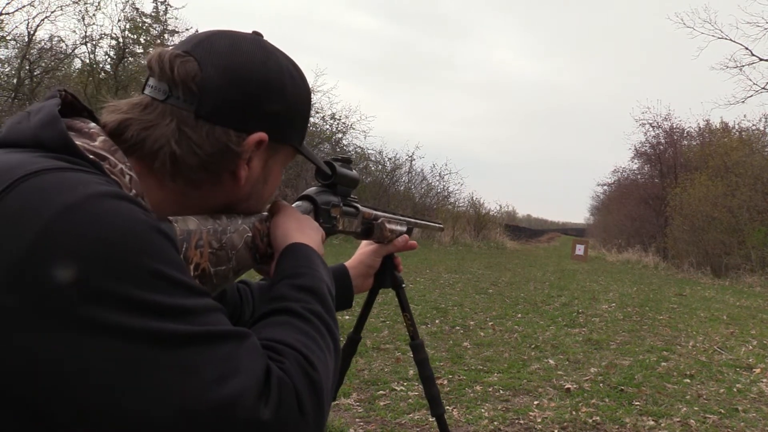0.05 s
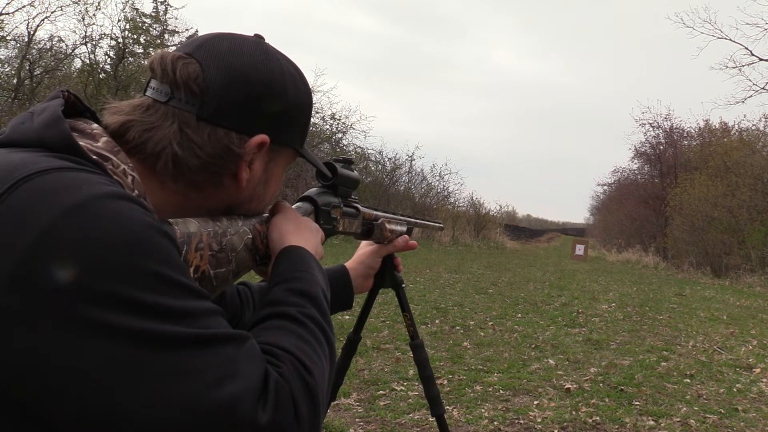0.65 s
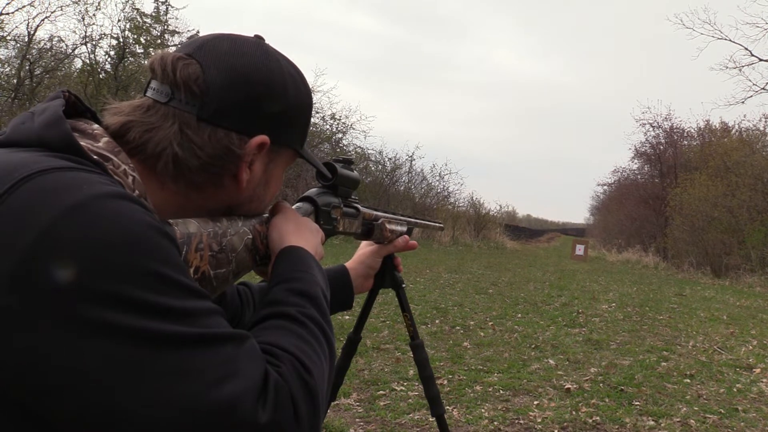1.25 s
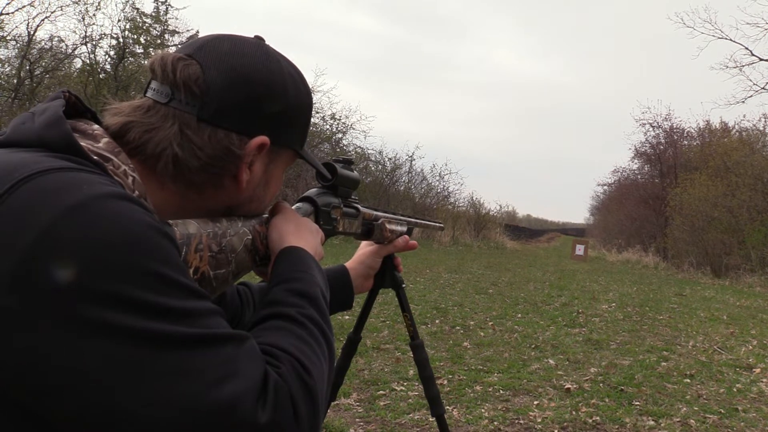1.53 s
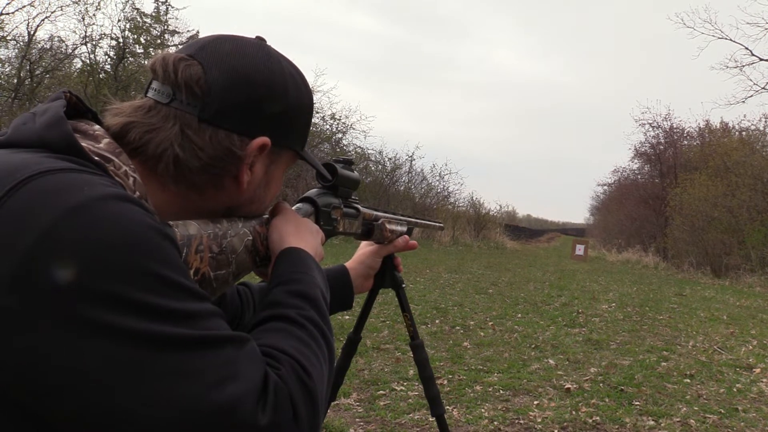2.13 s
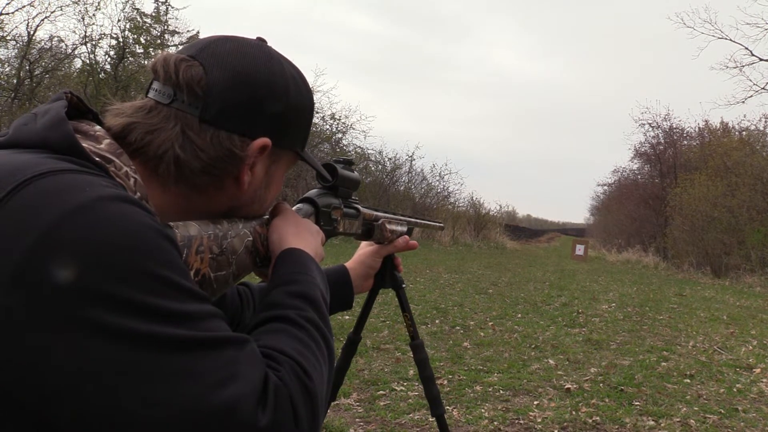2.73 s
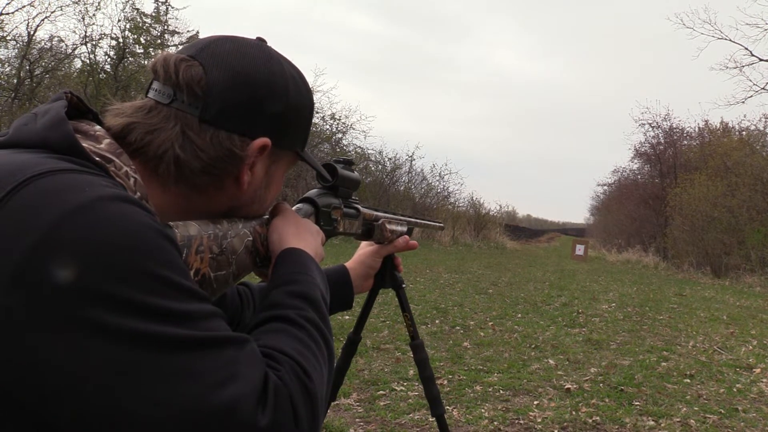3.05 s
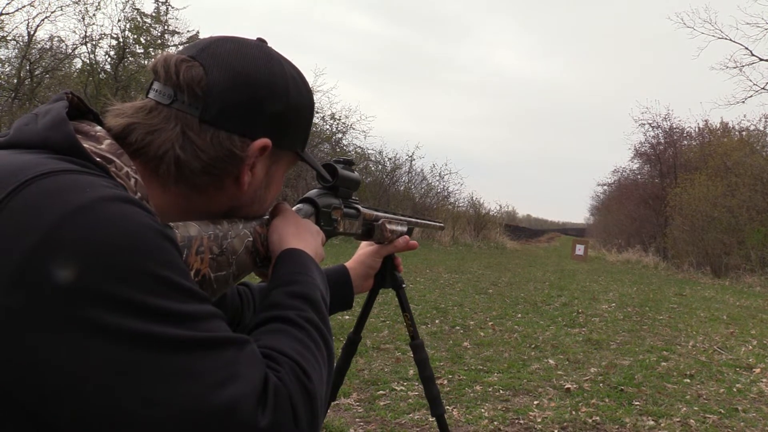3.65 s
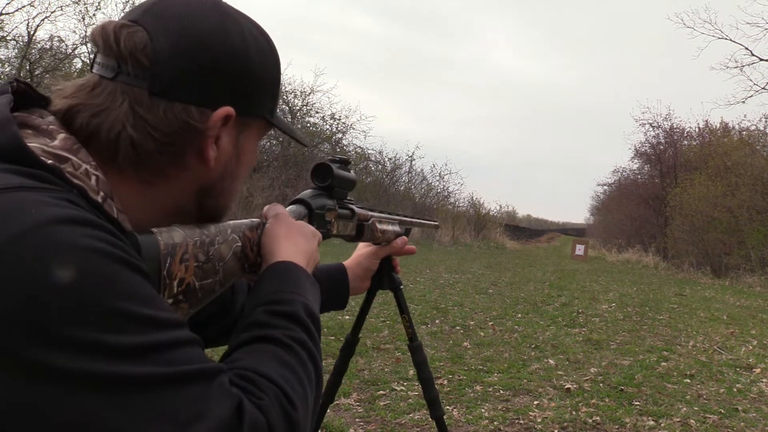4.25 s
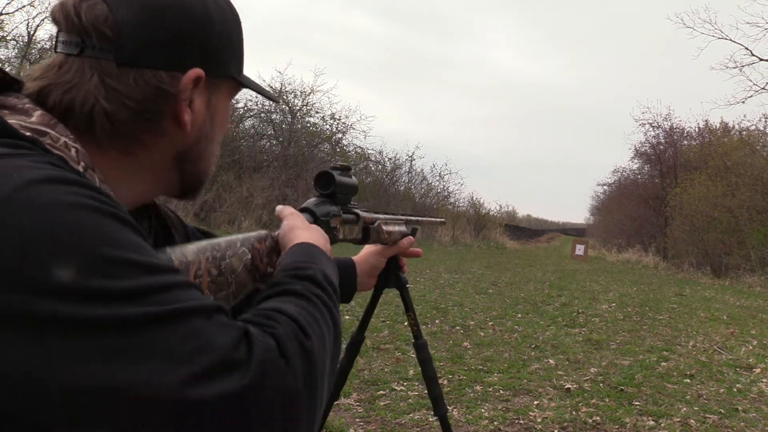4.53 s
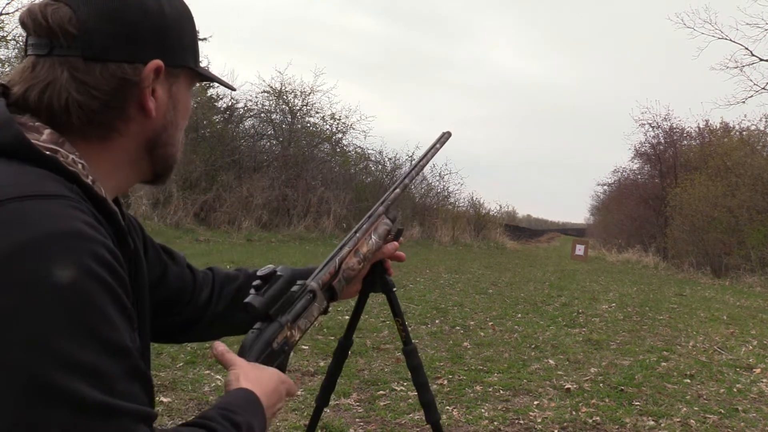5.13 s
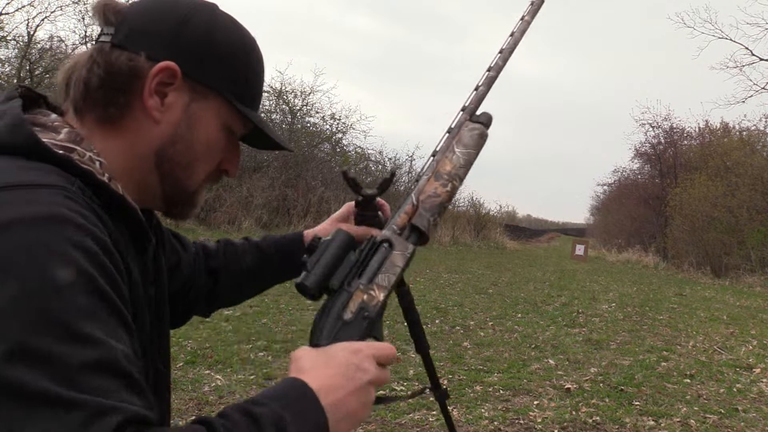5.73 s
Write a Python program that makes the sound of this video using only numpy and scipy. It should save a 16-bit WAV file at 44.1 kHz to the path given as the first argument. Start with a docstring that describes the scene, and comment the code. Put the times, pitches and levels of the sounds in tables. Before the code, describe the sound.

Birds whistle faintly in a light breeze until one shotgun shot cracks and rolls away, then the gun clicks once.

```python
"""A light breeze washes over a grass field lined with trees, and birds whistle and call.
A shotgun is fired from a bipod: its shock fronts overload the microphone, and the tree lines reflect
them as a dense crash that rolls away, with a dull thud from down range. The shooter then lifts the
gun off its rest: the contact rings the gun in one sharp click, and his sleeves rustle by friction."""
import sys
import numpy as np
from scipy import signal
from scipy.fft import rfft, irfft
from scipy.io import wavfile

SR = 44100
rng = np.random.default_rng(int(sys.argv[2]) if len(sys.argv) > 2 else 0)


def master_out(mix):
    """Clip the mix to full scale and print it as 16-bit PCM to the path in sys.argv[1]."""
    frames = np.transpose(np.atleast_2d(mix))
    ceiling = np.clip(frames, -1, 1)
    pcm = np.round(ceiling * 32767).astype(np.int16)
    wavfile.write(sys.argv[1], SR, pcm)


N = 255780
TIME = np.arange(N) / SR
FREQS = np.maximum(np.arange(N // 2 + 1) * SR / N, 1)


def from_db(db):
    """Amplitude ratio of a level: tenfold for every 20 dB."""
    return 10 ** (np.asarray(db) / 20)

def unit_rms(x):
    """Normalisation to unit mean power."""
    return x / np.sqrt(np.mean(x ** 2) + 1e-20)

def at_hz(points, hz):
    """Linear interpolation on a log-frequency axis."""
    return np.interp(np.log(hz), np.log(np.array(points)[:, 0]), np.array(points)[:, 1])

def drift(rate):
    """Random modulation of rms 1, changing about rate times a second."""
    knots = rng.standard_normal(N // 8)
    return unit_rms(np.interp(TIME * rate, np.arange(len(knots)), knots))

def panned(x, pan_db):
    """Level difference between the ears; positive leans left."""
    return x * from_db(np.array([[.5], [-.5]]) * pan_db)

def noise(gain, side_db):
    """Spectrally shaped Gaussian noise: a mid signal of rms 1, widened by an independent side signal."""
    white = rng.standard_normal((2, 2 * len(FREQS))).view(complex) * np.sqrt(N / 2)
    mid, side = white * unit_rms(gain)
    side = side * from_db(side_db)
    return irfft(np.array([mid + side, mid - side]), N)

def resonance(hz, width_hz):
    """Resonance curve with a peak of 1."""
    return 1 / (1 + ((FREQS ** 2 - hz ** 2) / (FREQS * width_hz)) ** 2)

def swell(s, half):
    """Gaussian envelope centred on s; the half-width is its standard deviation."""
    return np.exp(-.5 * np.minimum(((TIME - s) / half) ** 2, 100))

def noise_swells(rows, width, side_db):
    """Noise bands of constant relative bandwidth under Gaussian envelopes."""
    return sum(from_db(db) * swell(s, half) * noise(resonance(hz, width * hz), side_db)
               for s, db, half, hz in rows)

def burst(s, rise, decay):
    """Transient envelope: exponential growth to a peak at s, then exponential decay."""
    return np.exp(np.maximum(np.minimum((TIME - s) / rise, (s - TIME) / decay), -50))

def low_pass(x, hz):
    """Second-order Butterworth low-pass."""
    return signal.sosfilt(signal.butter(2, min(hz, SR / 2 - 100), fs=SR, output="sos"), x + 1e-18)

def high_pass(x, hz):
    """Fourth-order Butterworth high-pass."""
    return signal.sosfilt(signal.butter(4, hz, "high", fs=SR, output="sos"), x)

def scatter(x, t60):
    """Diffuse reverberation: many weak returns from grass and branches, different for each ear."""
    returns = rng.standard_normal((2, SR)) * np.exp(-np.log(1000) * TIME[:SR] / t60)
    returns /= np.sqrt(np.sum(returns ** 2, axis=1, keepdims=True))
    return signal.fftconvolve(x[None], returns, axes=1)[:, :N]


# Spectrum of the moving air: f/Hz, relative level/dB
BREEZE_SPECTRUM = [(15, -73.5), (25, -44), (37, -24), (56, -10), (101, -2), (281, -1.5), (349, -4.5),
                   (399, -4), (433, -6.5), (482, -7.5), (970, -10), (5280, -29), (8580, -31.5),
                   (14300, -41), (15500, -68.5)]
# Its stereo width: f/Hz, side minus mid/dB
BREEZE_SIDE = [(30, -11.5), (60, -17), (110, -21), (200, -19.5), (380, -10.5), (700, -2), (1290, -1.5),
               (2380, -1.5), (4400, 0), (8120, -3.5), (15000, -20.5)]
# Its direction: f/Hz, left minus right/dB
BREEZE_BALANCE = [(150, 1), (350, 2), (700, 0.5), (1500, -7), (3200, -4), (6000, -1), (11000, 0)]

def breeze(level_db=-48, gust_db=.5):
    """Flow noise: a steady wash of air, with the hiss of the leaves more from the right."""
    air = noise(from_db(at_hz(BREEZE_SPECTRUM, FREQS)), at_hz(BREEZE_SIDE, FREQS))
    air = irfft(panned(rfft(air), at_hz(BREEZE_BALANCE, FREQS)), N)
    return air * from_db(level_db + gust_db * drift(4.95))


def bird_tone(hz, waver, flutter_db):
    """A sine under random frequency and amplitude modulation."""
    phase = 2 * np.pi * np.cumsum(hz * (1 + waver * drift(150))) / SR
    return np.sqrt(2) * np.sin(phase) * from_db(flutter_db * drift(70))

# A bird's falling whistles: mid-glide t/s, level/dB, final f/Hz, hold/s, relative onset level/dB
FALLING_NOTES = [(0.662, -48.5, 4475, 0.12, -30), (2.758, -50.5, 4430, 0.11, -25)]

def whistles(glide_hz=2100, glide_s=.029, lead_s=.12, release_s=0.033, wood_db=-6):
    """Frequency glide: each whistle swells as it falls to a held note, and reverberates in the trees."""
    song = 0
    for s, db, final_hz, hold, onset_db in FALLING_NOTES:
        height = (1 - np.tanh((TIME - s) / glide_s / 2)) / 2   # falls from 1 to 0
        attack = np.clip((TIME - s + lead_s) / .02, 0, 1)
        release = np.exp(-np.clip((TIME - s - hold) / release_s, 0, 50))
        envelope = from_db(db + onset_db * height ** .5) * attack * release
        song = song + envelope * bird_tone(final_hz + glide_hz * height, waver=0.0056, flutter_db=3.5)
    return song + from_db(wood_db) * scatter(song, t60=0.61)


# Birds deep in the wood: t/s, relative level/dB, half-width/s, f/Hz
DISTANT_CALLS = [(2.26, -55, 0.059, 1560), (2.453, -57, 0.043, 1630), (2.747, -49, 0.025, 1360),
                 (2.823, -52.5, 0.043, 1310), (2.85, -56, .07, 1650), (2.968, -51.5, 0.041, 1450),
                 (3.29, -52, 0.082, 1390), (3.41, -56.5, 0.078, 1650), (3.522, -51.5, 0.028, 1570),
                 (3.775, -52, 0.039, 1350)]

def far_birds(level_db=-1.0):
    """Spectral broadening: distant calls arrive smeared into narrow bands of noise."""
    return from_db(level_db) * noise_swells(DISTANT_CALLS, width=0.16, side_db=-2.5)


# A nearby bird's pips just before the shot: t/s, level/dB, half-width/s, f/Hz
PIP_NOTES = [(3.681, -47, 0.0037, 2470), (3.714, -58, .009, 3260), (3.795, -34, 0.021, 2400)]

def pips(wood_db=-20):
    """Tone pulses: nearly pure notes swell and fade on one pitch, with faint reverberation."""
    song = sum(from_db(db) * swell(s, half) * bird_tone(hz, waver=0.0027, flutter_db=0.0)
               for s, db, half, hz in PIP_NOTES)
    return song + from_db(wood_db) * scatter(song, t60=0.6)


# Shock fronts of the report: t/s, level/dB, rise/s, decay/s, cutoff f/Hz
SHOCK_FRONTS = [(3.8203, 1, 0.0013, 0.0012, 6940), (3.8229, -3, 0.00014, 0.0019, 11000),
                (3.8243, 2, 0.00024, 0.0023, 4500), (3.8316, -22, 0.00073, 0.0019, 8000)]
# Spectrum of the turbulent gas: f/Hz, relative level/dB
GAS_SPECTRUM = [(18, -41), (30, -32.5), (680, -6.5), (978, -16), (1170, -6), (1870, -5), (2250, -10),
                (4200, -11.5), (5730, -16.5), (6360, -8.5), (8920, -21.5), (11300, -16), (15000, -27)]
# Its stereo width: f/Hz, side minus mid/dB
GAS_SIDE = [(150, -13), (350, -6.5), (1000, -12.5), (3000, -8), (6000, -10), (10000, -5)]

def report(pan_db=1.0, dip_db=-2.5, dip_hz=420):
    """Muzzle blast: each shock front is a turbulent burst that rises at once and dies in milliseconds."""
    spectrum_db = at_hz(GAS_SPECTRUM, FREQS) + dip_db * resonance(dip_hz, width_hz=280)
    gas = noise(from_db(spectrum_db), at_hz(GAS_SIDE, FREQS))
    fronts = sum(from_db(db) * low_pass(gas * burst(s, rise, decay), top_hz)
                 for s, db, rise, decay, top_hz in SHOCK_FRONTS)
    return panned(fronts, pan_db)


def plateau_db(s, rise, hold, fade):
    """Envelope in dB: exponential growth until s, a hold, then decay at fade dB a second."""
    attack = 20 * np.log10(np.e) * np.minimum(TIME - s, 0) / rise
    return np.maximum(attack - fade * np.maximum(TIME - s - hold, 0), -200)

# Reflecting stands of brush and trees, nearest first:
# t/s, relative level/dB, rise/s, hold/s, fade/(dB/s), bass weight/dB, treble tilt/(dB/kHz)
TREE_STANDS = [(3.825, -26.5, .003, 0.018, 400, 10.5, 1.75), (3.872, -18.7, 0.01, 0.059, 240, 3.5, 0.9),
               (3.958, -20, 0.014, 0.047, 127, 1.5, 0.75), (4.044, -18.5, 0.038, 0.029, 110, 1, 0.85),
               (4.126, -23, 0.05, 0.049, 327, 0.5, -1), (4.205, -33, .03, 0.26, 32.5, 3, -0.07),
               (4.683, -41, 0.098, 0.077, 22.5, -7, 0.1)]
# Spectrum of the scattered sound: f/Hz, relative level/dB
ECHO_SPECTRUM = [(53, -47), (90, -13), (140, -12), (181, -0.5), (306, -5.5), (565, -6.5), (862, -5),
                 (938, -6), (1340, 0), (1690, 1), (2810, -9), (3620, -11), (8260, -21), (14000, -38.5)]
# Its stereo width: f/Hz, side minus mid/dB
ECHO_SIDE = [(60, -25.5), (110, -19), (200, -24), (380, -11.5), (700, -3), (1290, -3), (2380, -2.5),
             (4400, -0.5), (8120, -7), (15000, -34.5)]
# Its direction: f/Hz, left minus right/dB
ECHO_BALANCE = [(150, 0.5), (350, 2.5), (700, 1), (1500, -0.5), (3200, -1.5), (6000, -2), (11000, -0.5)]

def tree_echo(level_db=2.5, grain_db=1.5, patchy_db=2.0, air_db_per_khz_s=4, treble_from_hz=1590):
    """Incoherent scattering: returns from countless trunks add in power; air absorbs treble en route."""
    travel_s = np.maximum(TIME - SHOCK_FRONTS[2][0], 0)   # since the strongest front
    stands = [(from_db(db + plateau_db(s, rise, hold, fade)) ** 2, bass, treble)
              for s, db, rise, hold, fade, bass, treble in TREE_STANDS]
    wash = noise(from_db(at_hz(ECHO_SPECTRUM, FREQS)), at_hz(ECHO_SIDE, FREQS))
    spectrum = rfft(wash * from_db(grain_db * drift(500)))   # single trunks stand out of the wash
    centres, echo = np.geomspace(100, 12800, 11), 0
    for hz, pick in zip(centres, np.eye(len(centres))):
        band = irfft(spectrum * np.interp(np.log(FREQS), np.log(centres), pick), N)
        bass_share = at_hz([(350, 0.75), (1100, 0)], hz)
        treble_khz = max(hz - treble_from_hz, 0) / 1000
        power = sum(envelope * from_db(bass * bass_share + treble * treble_khz) ** 2
                    for envelope, bass, treble in stands)
        absorbed_db = air_db_per_khz_s * treble_khz * travel_s
        gain = np.sqrt(power) * from_db(patchy_db * drift(50) - absorbed_db)
        echo = echo + panned(band, at_hz(ECHO_BALANCE, hz)) * gain
    onset = np.clip(travel_s / 0.003, 0, 1)
    return echo * onset * from_db(level_db)


# Sharp echoes from single trees: t/s, level/dB
TRUNK_RETURNS = [(3.891, -10.5), (3.907, -17), (3.927, -15), (3.963, -10.5), (3.987, -11.5), (4.059, -14),
                 (4.093, -11), (4.175, -25), (4.329, -24.5), (4.825, -36)]

def trunk_slaps(pan_db=-8.5, decay_s=0.0043, near_top_hz=7000, halving_s=0.29):
    """Discrete reflection: big trunks on the right each return a short crack, duller from farther away."""
    crack, slaps = noise(resonance(1590, width_hz=1500), side_db=-2), 0
    for s, db in TRUNK_RETURNS:
        travel_s = s - SHOCK_FRONTS[0][0]
        top_hz = near_top_hz / (1 + travel_s / halving_s)
        slaps = slaps + from_db(db) * low_pass(crack * burst(s, 0.0011, decay_s), top_hz)
    return panned(slaps, pan_db)


# Dull returns from down range: t/s, level/dB, f/Hz, T60/s
RANGE_RETURNS = [(3.893, -4.5, 495, 0.015), (3.909, -6.5, 305, 0.024), (4.056, -11.5, 230, 0.057),
                 (4.1328, 0, 363, 0.012), (4.33, -18.5, 270, 0.03)]

def thuds(low_cut_hz=170):
    """Damped oscillation: each far return is a few pressure swings without deep bass."""
    pressure = 0
    for s, db, hz, t60 in RANGE_RETURNS:
        age = np.maximum(TIME - s, 0)
        decay = np.exp(-np.log(1000) * age / t60)
        pressure = pressure + from_db(db) * np.sin(2 * np.pi * hz * age) * decay
    return high_pass(pressure, low_cut_hz)


# Late echoes from the far tree line: t/s, level/dB, half-width/s, f/Hz
LATE_RETURNS = [(4.45, -39, 0.16, 155), (4.74, -43, 0.035, 122), (4.85, -40, 0.11, 1161),
                (5.15, -44, 0.084, 1320)]

def rolls():
    """Temporal spreading: the far tree line returns the report as slow swells of noise."""
    return noise_swells(LATE_RETURNS, width=0.63, side_db=-27)


def ring(clicks, hz, t60):
    """Impulse response of one mode: a unit click starts a damped sine of height 1."""
    r = np.exp(-np.log(1000) / (t60 * SR))
    w = 2 * np.pi * hz / SR
    return signal.lfilter([0, np.sin(w)], [1, -2 * r * np.cos(w), r * r], clicks + 1e-18)

# Strokes of the gun against its rest: t/s, level/dB
CONTACTS = [(5.0912, -12), (5.0916, -21), (5.0923, -32)]
# Modes of the gun and its rest: f/Hz, relative level/dB, T60/s
GUN_MODES = [(680, -10.5, 0.0076), (2190, -17.5, 0.038), (2470, -23, 0.02), (3400, -7.5, 0.0087),
             (4350, -9.5, 0.0061), (5270, -14.5, .01), (5710, -16, 0.026), (6270, -4.5, 0.0093),
             (7300, -11.5, 0.0066), (8700, -12, .008), (10620, -23, .008), (12200, -25, .007)]

def gun_click(scatter_db=-12, pan_db=5.0, contact_hz=10500, snap_db=-25, snap_decay_s=0.0019):
    """Impact excitation: hard contacts ring the gun's modes, with a dry snap as the surfaces slip."""
    impulses = np.zeros(N)
    for s, db in CONTACTS:
        impulses[round(s * SR)] = from_db(db)
    force = low_pass(impulses, contact_hz)
    body = sum((-1) ** k * from_db(db) * ring(force, hz, t60)
               for k, (hz, db, t60) in enumerate(GUN_MODES))
    slip = noise(resonance(2800, width_hz=5000), side_db=-10)
    snap = from_db(snap_db) * slip * burst(CONTACTS[1][0], 0.00067, snap_decay_s)
    return panned(body + snap + from_db(scatter_db) * scatter(body, t60=0.074), pan_db)


# Sleeves brushing the gun: t/s, level/dB, half-width/s, f/Hz
CLOTH_STROKES = [(5.386, -62, .005, 9000), (5.403, -59, .008, 8500), (5.465, -70, .02, 4500),
                 (5.68, -55, .1, 950), (5.73, -58, .08, 4600)]

def sleeves():
    """Friction noise: cloth slides in short, soft, broadband strokes."""
    return noise_swells(CLOTH_STROKES, width=1.0, side_db=-18.5)


def scene(echo_low_hz=95):
    """Superposition: the field, the shot, its echoes and the handling add as pressures."""
    echoes = high_pass(rolls() + tree_echo() + trunk_slaps(), echo_low_hz)   # the echoes carry little deep bass
    shot = report() + echoes + thuds()
    handling = gun_click() + sleeves()
    birds = whistles() + pips() + far_birds()
    return breeze() + birds + shot + handling

def record(dry, ceiling=.93, cutoff_hz=15000):
    """Saturation and band limiting: the microphone overloads on the report and loses the top treble."""
    clipped = dry / (1 + (dry / ceiling) ** 6) ** (1 / 6)
    dulled = low_pass(clipped, hz=13700)
    return signal.sosfilt(signal.ellip(10, .1, 80, cutoff_hz, fs=SR, output="sos"), dulled)


dry = scene()
out = record(dry)
master_out(out)
```